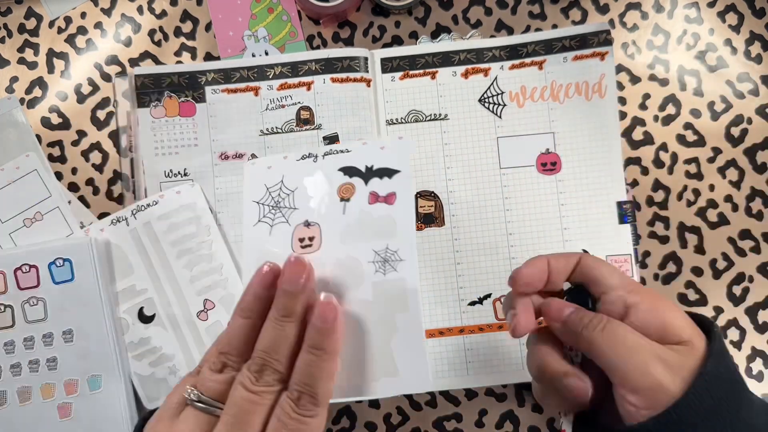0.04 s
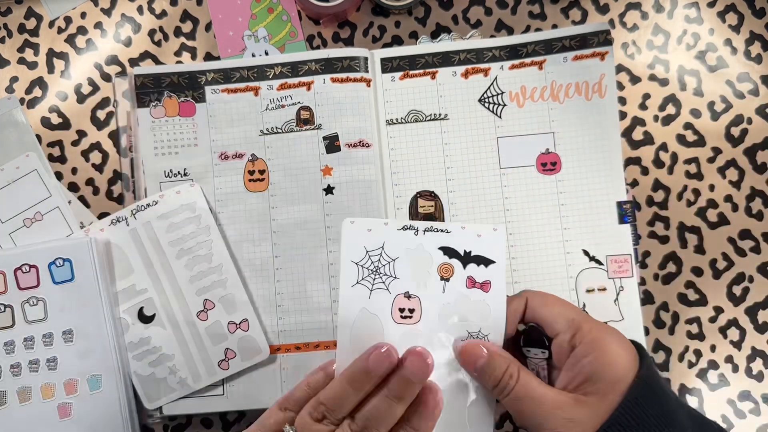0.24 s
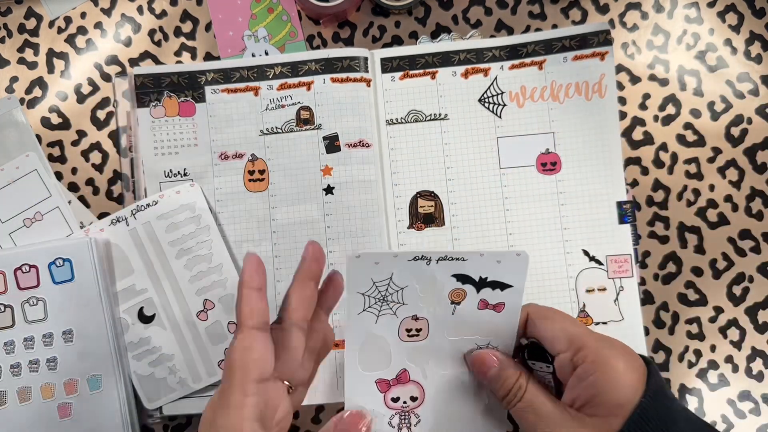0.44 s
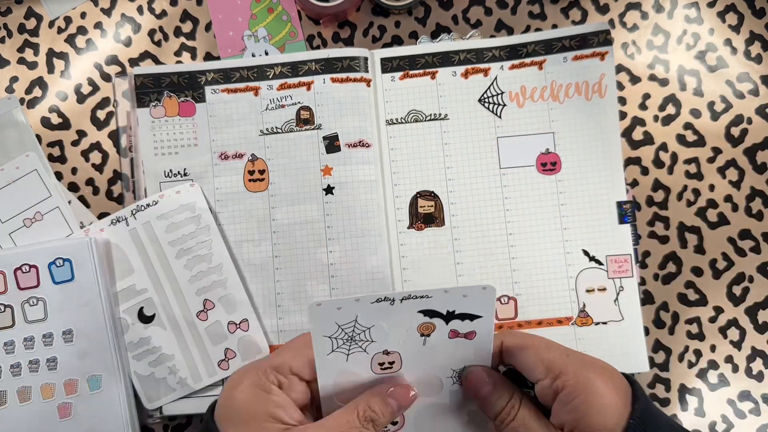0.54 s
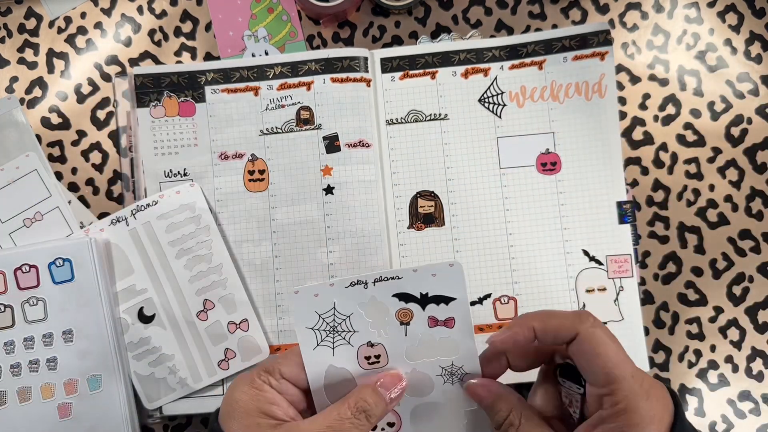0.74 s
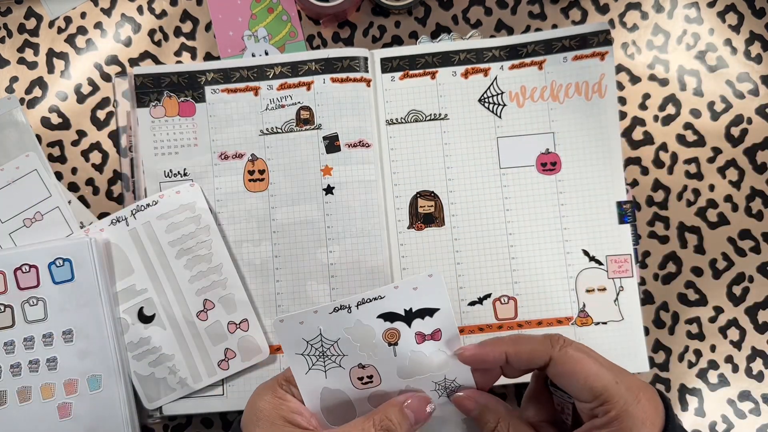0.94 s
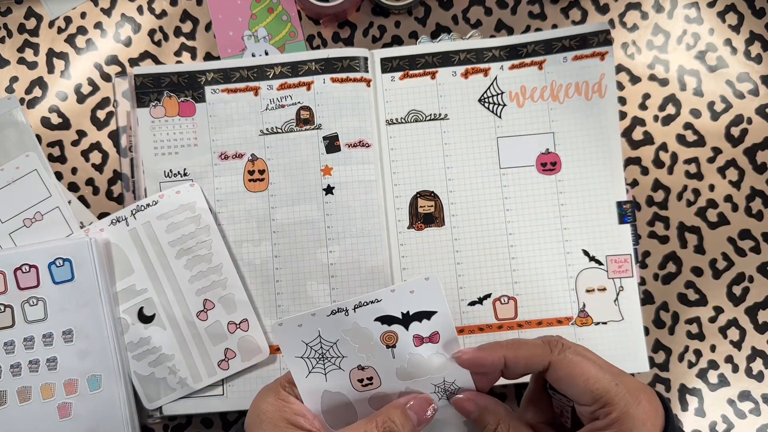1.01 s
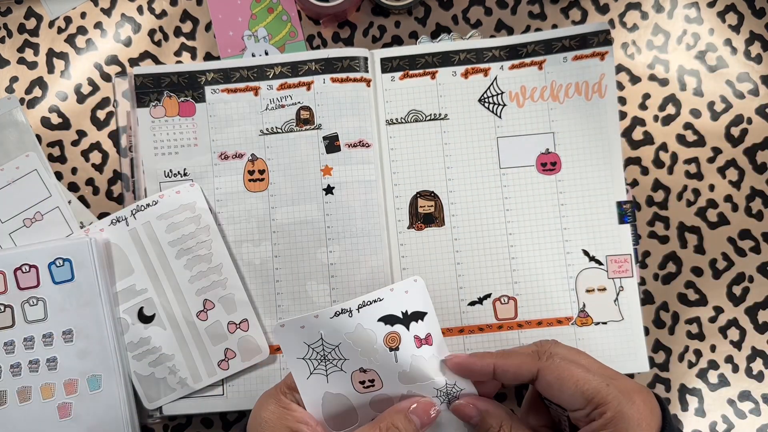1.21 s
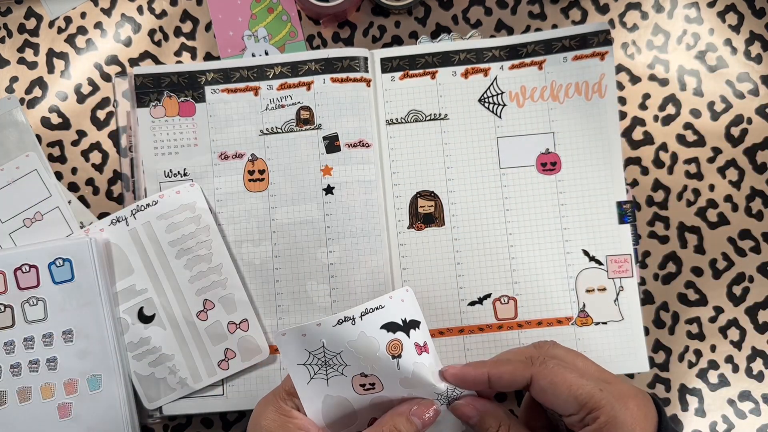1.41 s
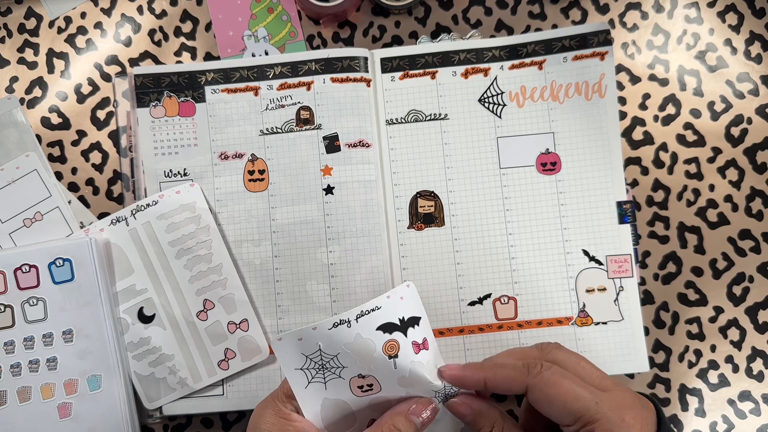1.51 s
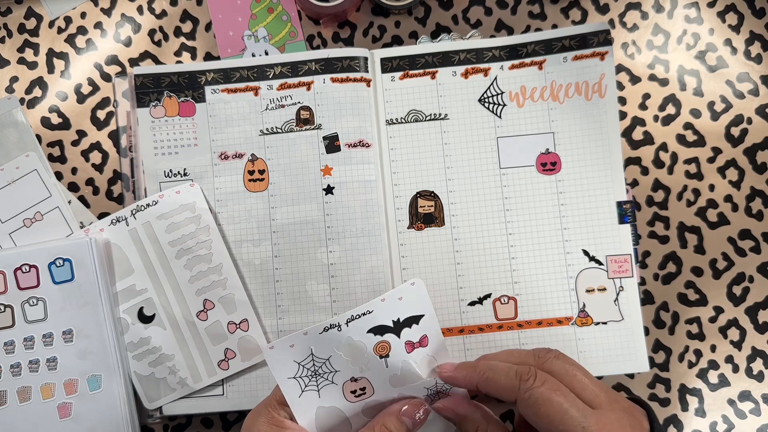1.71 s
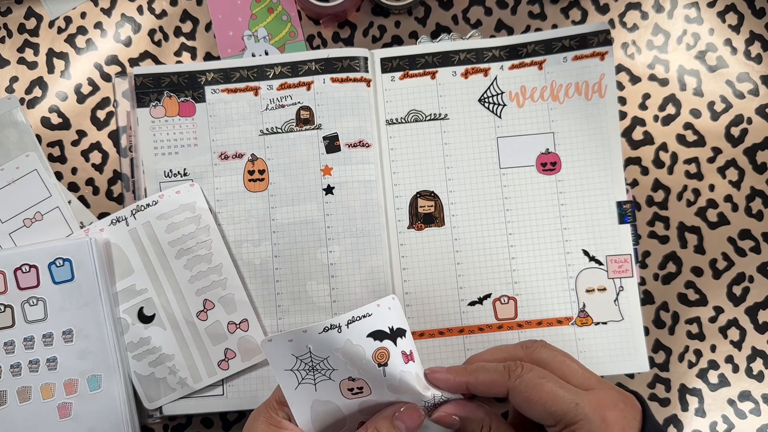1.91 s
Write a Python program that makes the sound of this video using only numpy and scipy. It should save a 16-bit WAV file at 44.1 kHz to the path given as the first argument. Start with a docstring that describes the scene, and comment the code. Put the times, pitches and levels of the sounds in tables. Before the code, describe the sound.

Close stereo sound of a glossy sticker sheet: a papery clatter of taps early on, another firm double tap, soft sliding, a near-quiet pause, then bright nail ticks and three brief peeling crackles over faint hiss.

```python
"""A stiff sticker sheet is slid off a paper planner, flaps against the page and is picked up, heard close in a small room.
Its edge taps as short damped bends with a snap and a scuff, twice firmly on the desk; flutter is a run of tiny hits.
Fingers slide over the glossy backing as fine friction grains, and a nail ticks as very short bursts of noise.
A sticker is peeled in three short pulls made of dense, clumped snaps; low damped swings thump underneath."""
import sys
import numpy as np
from scipy import signal
from scipy.fft import rfft, irfft
from scipy.io import wavfile

SR = 44100
rng = np.random.default_rng(int(sys.argv[2]) if len(sys.argv) > 2 else 0)


def transcribe(u):
    """Save the signal u as a 16-bit wav file named by the first command-line argument.

    u: samples, shape (n,) or (channels, n), limited to [-1, 1]; the rate is SR.
    q: integer samples, one column per channel.
    """
    v = np.clip(np.atleast_2d(u).T, -1, 1)
    q = np.round(v * 32767).astype(np.int16)
    wavfile.write(sys.argv[1], SR, q)


N = 85995
TIME = np.arange(N) / SR  # seconds
FREQS = np.fft.rfftfreq(N, 1 / SR)  # Hz

# Steady background hiss. Each row: frequency in Hz, relative strength in dB per Hz.
FLOOR_SPECTRUM = [(20, -11.5), (60, -4), (150, -8.5), (400, -17.5), (750, -23), (1300, -20), (3300, -20.5),
                  (7000, -22.5), (10700, -24.5), (15500, -19)]
FLOOR_DB = -70.5

# Skin and paper slide over the sheet. Each row: start in seconds, length in seconds, attack in seconds,
# release in seconds, level in dB before the catching, treble tilt in dB.
SLIDES = [(0, 0.042, 0.0026, 0.063, -50, -6.5), (0.025, 0.2, 0.042, 0.11, -70.5, 1.5),
          (0.1864, 0.034, 0.0084, 0.01, -47.5, -1), (0.209, 0.032, 0.0063, 0.014, -40.5, -3.5),
          (0.244, 0.052, .01, 0.0095, -50, -7.5), (0.351, 0.074, 0.031, 0.031, -60.5, 4),
          (0.376, 0.25, 0.081, 0.13, -58, -0.5), (0.571, 0.17, 0.045, 0.13, -48, -2.5),
          (0.724, 0.061, 0.017, 0.0077, -65.5, -3.5), (0.774, 0.3, 0.03, 0.19, -59, -2.5),
          (1.053, .17, 0.014, 0.11, -63, -2.5), (1.165, 0.21, 0.017, .03, -69, 1),
          (1.788, 0.088, 0.035, 0.072, -56, -2)]
# Tone of the sliding. Each row: frequency in Hz, relative strength in dB per Hz.
SLIDE_SPECTRUM = [(100, -39.5), (700, -13.5), (1200, -1), (2500, -10), (3400, -1.5), (4600, -7.5),
                  (7500, -2.5), (9500, -4.5), (10800, 0), (12200, -6.5), (15500, -7)]
SLIP_SPREAD_DB = 4
CATCH_HZ, CATCH_DB = 60, 1.7  # fastest swelling and its typical size

# The sheet flutters against the page. Each row: start in seconds, length in seconds, attack in seconds,
# release in seconds, level in dB.
FLUTTERS = [(.008, 0.042, 0.0013, 0.038, -52), (0.211, 0.059, .008, 0.017, -41),
            (0.263, 0.06, 0.012, 0.019, -48), (0.598, 0.096, 0.056, 0.049, -54.5)]
# Tone of the flutter. Each row: frequency in Hz, relative strength in dB per Hz.
FLUTTER_SPECTRUM = [(40, -34), (120, -7), (350, -3.5), (540, 1.5), (820, -5.5), (1270, -7), (1650, -8),
                    (3600, -14.5), (5200, -13.5), (10000, -21.5), (16000, -52)]
FLUTTER_SPREAD_DB = 2.5

# The sheet's edge taps. Each row: time in seconds, level of the bend in dB, starting pitch in Hz,
# ring in seconds, snap in dB relative to the bend (before the shared snap and scuff levels).
TAPS = [(.0082, -38, 800, 0.0007, -3.5), (0.1886, -39, 1390, 0.00027, -17),
        (0.2094, -31, 1800, 0.00061, -0.5), (0.2129, -23.5, 1400, .0009, -0.5),
        (0.2197, -26.5, 654, 0.0049, -5.5), (0.2271, -23.5, 1300, .002, -5.5),
        (0.2338, -26, 1300, 0.0027, -6.5), (0.2375, -26.5, 1370, .0022, -3.5),
        (0.2423, -26, 1200, 0.00067, -4), (.247, -26, 1165, 0.0029, -6.5),
        (0.281, -32.5, 1150, 0.0027, -10), (0.2874, -20, 1051, 0.0013, -5.5),
        (0.2907, -25, 1360, 0.00048, -4), (.2934, -27, 990, 0.00093, -16),
        (0.3738, -42.5, 1200, 0.001, -10), (0.5654, -47.5, 1350, .0015, -2), (0.5766, -46, 1450, 0.0052, 1),
        (.5869, -22.5, 1420, .0011, -3), (.6079, -22.5, 1320, .0012, -7), (0.6605, -37.5, 1530, 0.0022, -4),
        (0.7926, -50.5, 1260, 0.0029, -5.5)]
# Tone of the snap and scuff. Each row: frequency in Hz, relative strength in dB per Hz.
SNAP_SPECTRUM = [(100, -17), (500, 2), (1300, 10), (2200, 2.5), (3200, 1), (4200, -5.5), (5400, -17),
                 (10000, -26), (16000, -25.5)]
TAP_RISE_S, SAG_S = .0005, .012  # the pitch has halved after SAG_S
SNAP_DB, SCUFF_DB = -4, -1.5
SCUFF_RISE_S, SCUFF_FALL_S = 0.0016, .0013

# The planner and the desk give under the hand and the sheet. Each row: time in seconds, level in dB,
# pitch in Hz, ring in seconds.
THUMPS = [(.009, -36, 508, 0.0026), (.018, -55.5, 282, 0.029), (.02, -54, 113.7, 0.038),
          (0.221, -40, 141, 0.0094), (0.252, -39.5, 66.9, 0.03), (0.303, -52, 78.2, 0.049),
          (.374, -47, 533, 0.0057), (.587, -47, 265, 0.0055), (0.6104, -39, 345, 0.0051),
          (.65, -60, 269, 0.023), (1.825, -65, 311, 0.017)]
THUMP_RISE_CYCLES, THUMP_NOISE_DB = 0.63, -7

# A fingernail ticks on the sticker's edge. Each row: time in seconds, level in dB.
TICKS = [(0.2407, -33), (1.0604, -60.5), (1.2938, -35), (1.589, -39)]
# Tone of the ticks. Each row: frequency in Hz, relative strength in dB per Hz.
TICK_SPECTRUM = [(200, -46), (1900, -22.5), (3400, -4.5), (5200, -5.5), (8000, 7.5), (10000, -7),
                 (10750, 10.5), (11700, -4.5), (15500, -4.5)]
TICK_S, TICK_TAIL_S, TICK_TAIL_DB = .0012, .01, -18

# The sticker lets go of its backing. Each row: start in seconds, length in seconds, attack in seconds,
# release in seconds, level in dB before the clumping, treble tilt in dB.
PEELS = [(1.349, 0.092, 0.0023, 0.054, -57.5, 2), (1.507, 0.14, 0.032, 0.047, -49, 5.5),
         (1.538, 0.11, 0.06, 0.045, -52, -10.5), (1.708, 0.088, 0.025, 0.037, -48, -1.5),
         (1.783, 0.24, 0.011, 0.24, -66.5, 1.5)]
# Tone of the peeling. Each row: frequency in Hz, relative strength in dB per Hz.
PEEL_SPECTRUM = [(100, -24.5), (520, -15.5), (1150, -6), (1325, 4.5), (1500, -1.5), (1790, 2.5),
                 (2400, -6.5), (3800, -1), (5500, -9.5), (8000, -8.5), (10700, -8), (12500, -12),
                 (15500, -15)]
PEEL_HISS = .8  # hiss relative to the snaps
CLUMP_HZ, CLUMP_DB = 400, 1.6  # fastest swelling and its typical size

# How long the room rings. Each row: frequency in Hz, time in seconds to fade by 60 dB.
ROOM_FADE = [(100, 1), (500, 0.28), (1400, 0.26), (4000, 0.37), (12000, 0.17)]
ROOM_DB, DESK_ECHO_DB, DESK_ECHO_S = -16, -15, .009

# Timing between the ears. Each row: frequency in Hz, phase in radians by which the left ear leads.
LEFT_LEAD = [(60, 0), (250, .2), (1000, .3), (1900, .45), (3500, 1.6), (6000, 1.8), (7900, 2.9), (9800, .5),
             (13500, .3), (15500, 2)]
# How alike the two sides of noise are. Each row: frequency in Hz, left-right likeness from 0 to 1.
LIKENESS = [(100, 0.95), (1000, 0.68), (2500, 0.98), (5000, 0.46), (10000, 0.86), (16000, 1)]
BALANCE_DB = 1.14  # left minus right
TOP_HZ = 16000  # upper edge of the sound


def amp(db):
    """Turns decibels into gain."""
    return 10 ** (np.asarray(db) / 20)


def unit(x):
    """Scales a sound to an rms of 1."""
    return x / np.sqrt(np.mean(x ** 2) + 1e-20)


def read(points, hz):
    """Reads between the rows of a table, along a log-frequency axis."""
    f, value = np.transpose(points)
    return np.interp(np.log(hz + 1), np.log(f + 1), value)


def colour(x, points, tilt_db=0, pivot_hz=5000):
    """Filters to a given spectrum; tilt raises the treble and lowers the bass around the pivot."""
    hz = abs(np.fft.fftfreq(4096, 1 / SR))
    tilt = tilt_db * np.tanh(2 * np.log((hz + 1) / pivot_hz))
    log_gain = np.log(amp(read(points, hz) + tilt))
    # Minimum phase: the filter responds as early as it can, never ahead of the sound.
    response = np.exp(np.conj(signal.hilbert(log_gain)))
    kernel = np.fft.ifft(response).real[:len(hz) // 2]
    kernel = kernel / np.linalg.norm(kernel)  # unit energy
    return signal.oaconvolve(x, kernel[None], axes=1)[:, :N]


def pair(x):
    """Blends two unrelated signals into a partly alike left and right."""
    a, b = rfft(x)
    same = np.clip(read(LIKENESS, FREQS), 0, 1)
    mid = a * np.sqrt((1 + same) / 2)
    side = b * np.sqrt((1 - same) / 2)
    return irfft(np.array([mid + side, mid - side]), N)


def stereo_noise():
    """Plain random noise for the two sides."""
    return pair(rng.standard_normal((2, N)))


def grains(per_s, spread_db, hiss):
    """Tiny slips of uneven size over a smooth hiss."""
    size_db = spread_db * np.minimum(rng.exponential(1, (2, N)), 4)
    size = amp(size_db) * rng.choice([-1, 1], (2, N))
    slips = unit(size * (rng.random((2, N)) < per_s / SR))
    return pair(unit(slips + hiss * rng.standard_normal((2, N))))


def clumps(hz, spread_db):
    """A randomly swelling gain, with little change faster than hz, as surfaces catch and let go."""
    lowpass = signal.butter(2, hz, fs=SR, output="sos")
    swell = unit(signal.sosfilt(lowpass, rng.standard_normal(N)))
    return amp(spread_db * swell)


def stroke(start, length, attack, release):
    """Attack, hold and release of one movement; the length includes all three."""
    rise = np.clip((TIME - start) / attack, 0, 1)
    fall = np.clip((start + length - TIME) / release, 0, 1) ** 1.03
    return rise * fall


def blow(at, rise, ring):
    """A quick rise to one instant and a decay from it."""
    return np.exp(np.minimum((TIME - at) / abs(rise), (at - TIME) / abs(ring)))


def floor():
    """A faint steady hiss: noise with a fixed spectrum."""
    return amp(FLOOR_DB) * colour(stereo_noise(), FLOOR_SPECTRUM)


def slides():
    """Fine friction grains radiated by the sheet, swelling where the skin catches."""
    slips = grains(per_s=4800, spread_db=SLIP_SPREAD_DB, hiss=0.4) * clumps(CATCH_HZ, CATCH_DB)
    out = np.zeros((2, N))
    for *shape, db, tilt in SLIDES:
        out += colour(amp(db) * stroke(*shape) * slips, SLIDE_SPECTRUM, tilt)
    return out


def flutter():
    """A quick run of small collisions between sheet and page."""
    force = sum(amp(db) * stroke(*shape) for *shape, db in FLUTTERS)
    hits = grains(per_s=860, spread_db=FLUTTER_SPREAD_DB, hiss=.3)
    return colour(force * hits, FLUTTER_SPECTRUM)


def taps():
    """Each tap scuffs in, snaps and bends the sheet for a few cycles of falling pitch."""
    bend, snap, scuff = np.zeros((3, N))
    for at, db, hz, ring, snap_db in TAPS:
        age = TIME - at
        sagging_age = np.where(age > 0, SAG_S * np.log1p(abs(age / SAG_S)), age)
        bend += amp(db) * blow(at, TAP_RISE_S, ring) * np.cos(2 * np.pi * hz * sagging_age)
        snap += amp(db + snap_db) * np.sinc(age * SR)  # a click about one sample wide
        # The edge scuffs just before and after contact.
        scuff += amp(db + snap_db) * blow(at, SCUFF_RISE_S, SCUFF_FALL_S)
    crack = amp(SNAP_DB) * snap + amp(SCUFF_DB) * scuff * stereo_noise()
    return bend + colour(crack, SNAP_SPECTRUM)


def rumble(hz):
    """Low noise, about an octave and a half wide, around the given centre."""
    band = signal.butter(2, [hz / np.sqrt(3), hz * np.sqrt(3)], "band", fs=SR, output="sos")
    return unit(signal.sosfilt(band, stereo_noise()))


def thumps():
    """Heavily damped low swings, mixed with rumble, under the larger movements."""
    out = np.zeros((2, N))
    for at, db, hz, ring in THUMPS:
        swing = np.sin(2 * np.pi * hz * (TIME - at))
        shape = blow(at, THUMP_RISE_CYCLES / hz, ring)
        out += amp(db) * shape * (swing + amp(THUMP_NOISE_DB) * rumble(hz))
    return out


def ticks():
    """Bright, very short nail clicks, after which the sheet shivers briefly."""
    force = np.zeros(N)
    for at, db in TICKS:
        click = blow(at, .0001, TICK_S)
        shiver = amp(TICK_TAIL_DB) * blow(at, .0001, TICK_TAIL_S)
        force += amp(db) * (click + shiver)
    return colour(force * stereo_noise(), TICK_SPECTRUM)


def peels():
    """Glue lets go in dense tiny snaps that come in clumps."""
    snaps = grains(per_s=3100, spread_db=1.5, hiss=PEEL_HISS) * clumps(CLUMP_HZ, CLUMP_DB)
    out = np.zeros((2, N))
    for *shape, db, tilt in PEELS:
        out += colour(amp(db) * stroke(*shape) * snaps, PEEL_SPECTRUM, tilt, pivot_hz=2160)
    return out


def room(x):
    """Adds quick reflections from the desk and a short diffuse tail, both made of fading noise."""
    hz, t, z = signal.stft(stereo_noise(), SR, nperseg=256)
    fade = amp(-60 * t / read(ROOM_FADE, hz)[:, None])  # each pitch fades at its own rate
    tail = signal.istft(z * fade, SR, nperseg=256)[1][:, :N]
    tail = tail * np.minimum(TIME / 0.0044, 1)  # the tail builds up over 4.4 ms
    early = stereo_noise() * blow(0.00053, .0004, DESK_ECHO_S)
    echoes = (amp(ROOM_DB) * unit(tail) + amp(DESK_ECHO_DB) * unit(early)) / np.sqrt(N)
    return x + signal.fftconvolve(x, echoes, axes=1)[:, :N]


def scene():
    """The handling echoes in the room; the thumps and the faint hiss are added without echo."""
    handling = slides() + flutter() + taps() + ticks() + peels()
    return room(handling) + thumps() + floor()


def record(dry):
    """Two close microphone ports differ in phase and level; then the top of the treble is cut."""
    half = np.exp(.5j * read(LEFT_LEAD, FREQS)) * amp(BALANCE_DB / 2)  # half the difference per side
    ports = irfft(rfft(dry) * np.array([half, 1 / half]), N)
    lowpass = signal.firwin(401, TOP_HZ, window=("kaiser", 8), fs=SR)
    return signal.oaconvolve(ports, lowpass[None], "same", axes=1)


dry = scene()
out = record(dry)
transcribe(out)
```